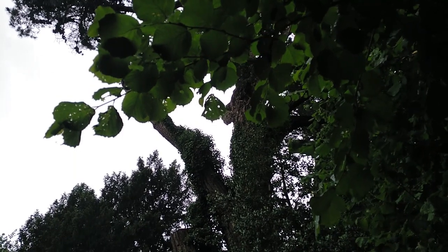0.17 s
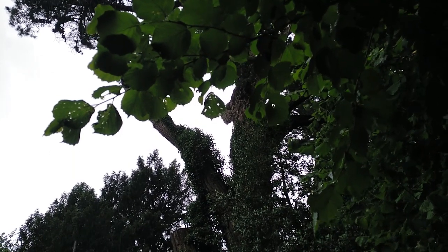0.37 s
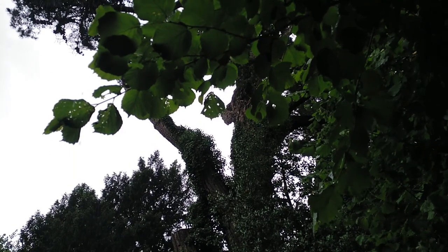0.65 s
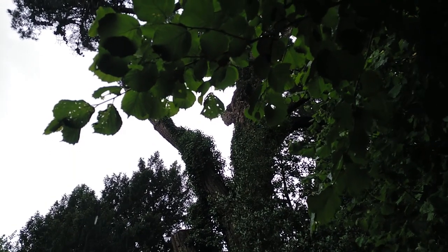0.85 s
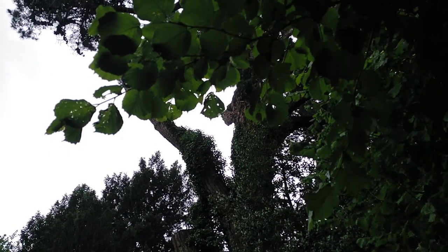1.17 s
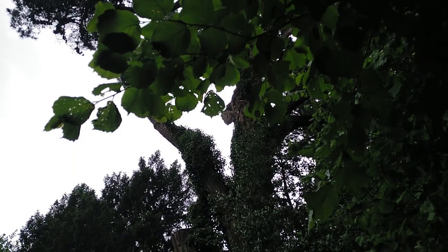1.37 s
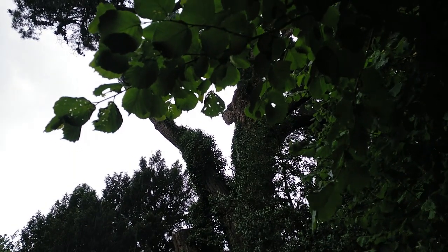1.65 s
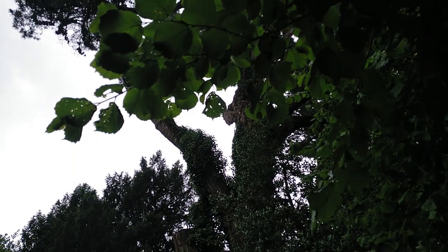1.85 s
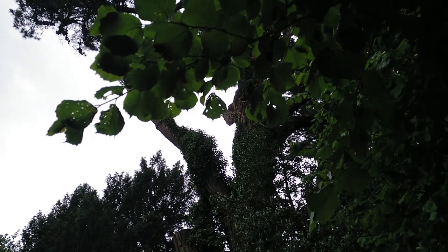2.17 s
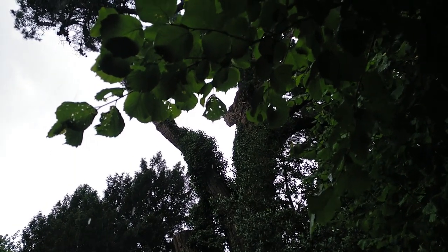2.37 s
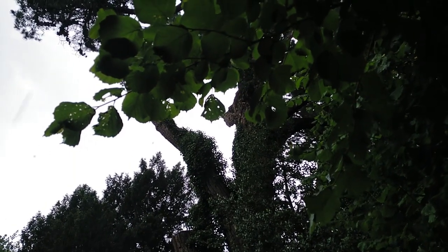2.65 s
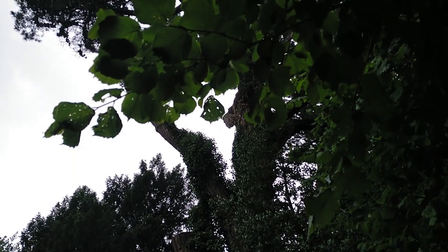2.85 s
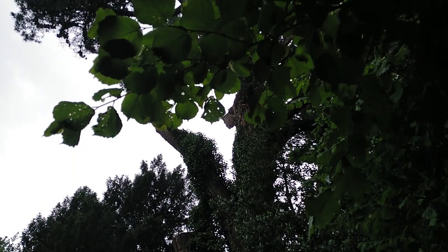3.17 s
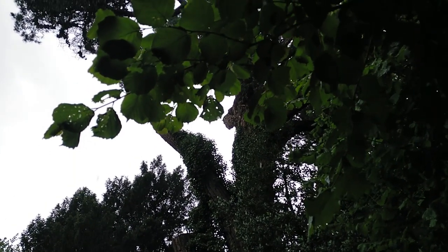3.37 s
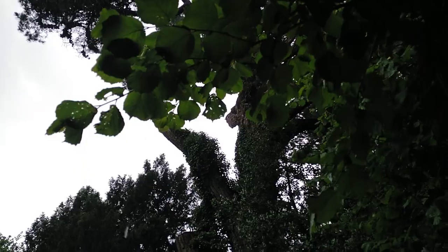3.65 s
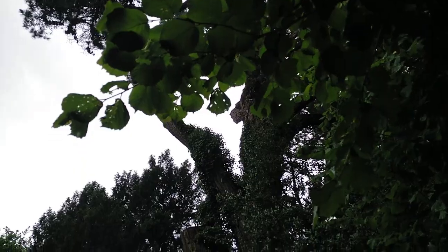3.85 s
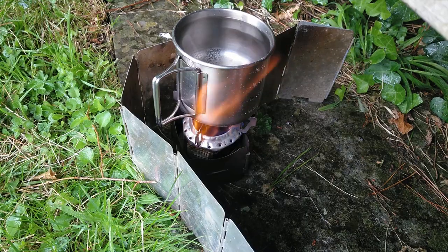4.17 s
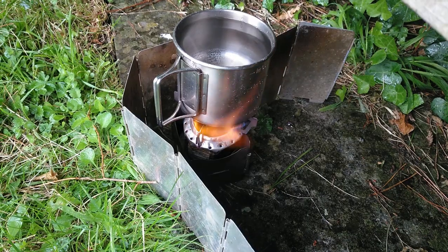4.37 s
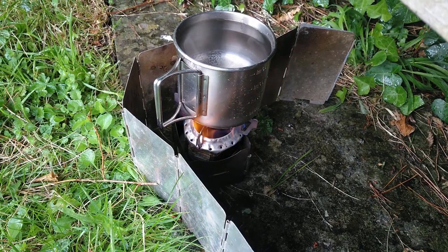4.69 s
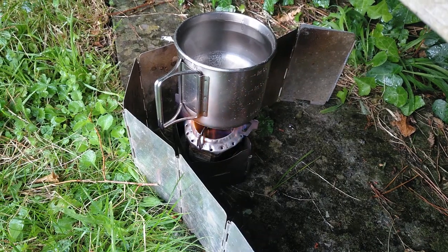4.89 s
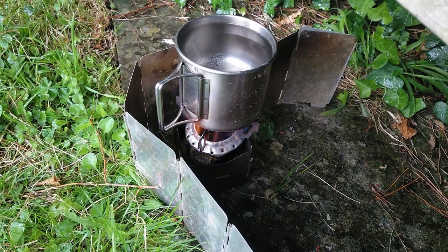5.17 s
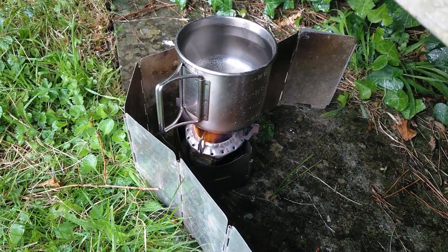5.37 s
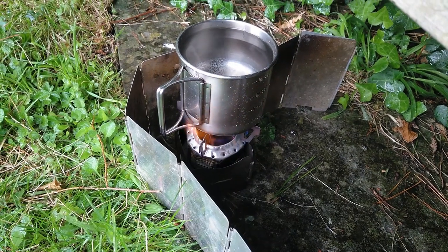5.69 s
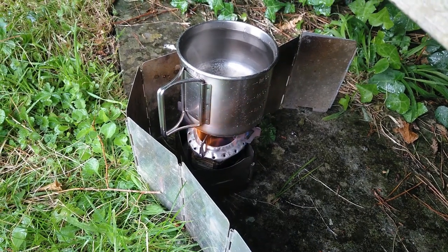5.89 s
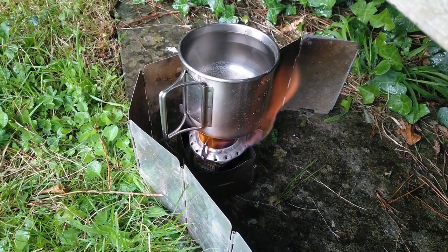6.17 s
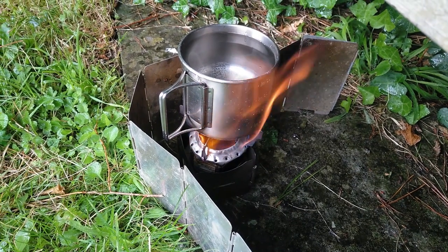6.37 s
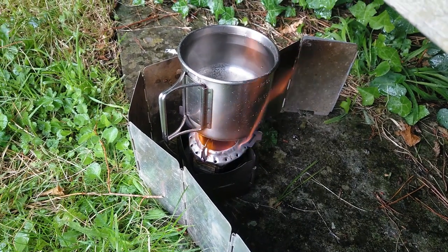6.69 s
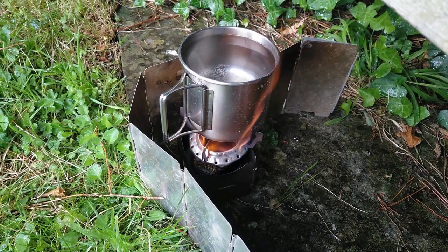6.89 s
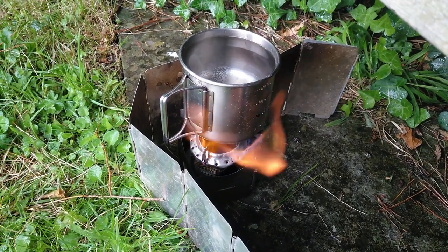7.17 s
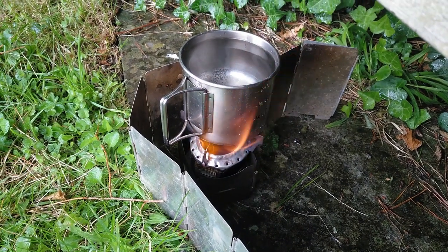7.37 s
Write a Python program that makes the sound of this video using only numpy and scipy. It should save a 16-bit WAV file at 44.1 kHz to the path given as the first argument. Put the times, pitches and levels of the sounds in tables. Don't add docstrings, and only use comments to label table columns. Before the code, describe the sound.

Outdoors, heavy rain hisses densely through a tree crown, with a few sharp leaf taps and a very faint distant engine hum. A soft thump and drop hits come just before an abrupt cut near four seconds. Then much quieter, thinner rain fades in quickly at ground level, with many close drops thudding, tapping and splashing on leaves and grass. Wide stereo microphone, close to the foliage.

```python
import sys
import numpy as np
from scipy import signal
from scipy.fft import rfft, irfft, next_fast_len
from scipy.io import wavfile
from scipy.ndimage import uniform_filter1d

SR = 44100
rng = np.random.default_rng(int(sys.argv[2]) if len(sys.argv) > 2 else 0)


def log_audio(samples):
    frames = np.atleast_2d(samples).T
    limited = np.clip(frames, -1, 1)
    pcm = np.round(limited * 32767).astype(np.int16)
    wavfile.write(sys.argv[1], SR, pcm)


def invert_db(level):
    return 10 ** (np.asarray(level, dtype=float) / 20)


N = 332060

# time_s, rain_level_db, rumble_level_db
CROWN_LEVELS = [
    (0.0, -38.5, -78),
    (1.47, -38.5, -78),
    (1.9, -38.5, -71),
    (3.77, -38.5, -74),
    (3.92, -38.5, -78),
]
GROUND_LEVELS = [
    (4.15, -49.5, -76),
    (4.29, -50, -76),
    (5.82, -49, -79),
    (6.1, -49, -72),
    (6.99, -49, -79),
    (7.53, -48.5, -70),
]
# time_s, gain_db
FADE_IN = [
    (3.925, -50),
    (3.95, -45),
    (3.9585, -30),
    (3.96, -14),
    (3.97, -15),
    (4.0, -9),
    (4.07, -7),
    (4.11, -2),
    (4.16, 0),
]
CROWN_END_S = 3.9243
# frequency_hz, density_db
CROWN_SPECTRUM = [(65, -31), (110, -24.5), (345, -10.5), (415, -8.5), (470, -4.5), (579, -5), (656, -1.5),
                  (2140, 2.5), (5120, -4.5), (8250, -9.5), (9540, -15.5), (11500, -28.5), (15700, -28.5)]
GROUND_SPECTRUM = [(65, -36), (110, -13.5), (189, -18), (324, -11), (603, -1.5), (807, -4.5), (1740, -1),
                   (3240, -3.5), (6570, -5), (9540, -14), (11500, -26), (14800, -25.5), (15700, -35)]
RUMBLE_SPECTRUM = [(13, -57), (22, -18), (58, 11), (75, 11), (129, -2.5), (160, -12), (210, -33),
                   (350, -120)]
# frequency_hz, correlation (1 = identical)
CROWN_COHERENCE = [(60, 0.43), (180, 1), (550, 0.77), (1650, -0.071), (4970, -0.033), (15000, -0.018)]
GROUND_COHERENCE = [(60, 0.9), (180, 0.83), (550, 0.75), (1650, 0.059), (4970, -0.059), (15000, 0.14)]
# frequency_hz, left_minus_right_db
CROWN_BALANCE = [(60, 0.5), (150, 0.5), (380, 0), (950, 2), (2380, 5), (5980, 2.5), (15000, -3.5)]
GROUND_BALANCE = [(60, 0), (150, -1.5), (380, 2), (950, 1), (2380, 2.5), (5980, -3), (15000, -1)]
# time_s, pitch_hz, level_db
ENGINE = [
    (1.6, 67, -79),
    (2.066, 70.5, -66),
    (2.5, 73.7, -76),
]
# start_s, peak_db, pitch_hz, t60_s
THUMPS = [
    (3.679, -41, 70, 0.12),
]
# frequency_hz, gain_db
NEAR_RESPONSE = [(50, -22), (200, -3.5), (8500, -2.5), (10500, -12.5), (12000, -11), (15700, -16),
                 (16000, -30)]

# start_s, peak_db, pitch_hz, left_minus_right_db
CROWN_THUDS = [
    (0.0392, -32, 775, 8),
    (3.6776, -38, 820, -9),
    (1.445, -35, 600, 0),
    (2.637, -36, 600, 0),
    (3.0955, -35, 600, 0),
]
GROUND_THUDS = [(4.1156, -42, 626, 1), (4.1512, -42, 780, 10), (4.2533, -45, 636, -2), (4.241, -44, 650, 0),
                (4.393, -47, 520, 0), (4.5004, -44, 650, -3), (4.5225, -45, 790, -2), (4.7475, -38, 724, 1),
                (4.7803, -40, 840, -1), (4.8436, -44, 820, -10), (4.9328, -42.5, 620, 1),
                (4.9918, -47, 530, 4), (5.1067, -42.5, 674, -4), (5.2205, -41, 830, 3),
                (5.2382, -39, 830, 0), (5.3931, -41, 940, -4), (5.4655, -44, 580, 2), (5.199, -45, 600, 0),
                (5.636, -44, 600, 0), (5.847, -44, 600, 0), (5.9215, -43, 600, 0), (7.439, -41, 1050, 0),
                (5.6307, -44, 910, -1), (5.8368, -34, 815, 1), (6.4932, -46, 740, 1.5),
                (6.5538, -31.5, 800, 5), (6.5852, -37, 600, 3), (6.7069, -46, 730, -1),
                (6.7377, -43, 910, 13), (6.802, -32.5, 580, 1), (7.2341, -37, 960, 0),
                (7.3209, -33.5, 760, -4), (7.305, -43, 600, 0), (7.3292, -38, 620, 7),
                (7.5032, -34.5, 650, 1), (7.5105, -40, 560, 2)]
LEAF_PUSHES = [
    (4.424, -47, 250, -21),
    (4.7478, -59, 260, -2),
    (6.1672, -42.5, 252, 3),
    (6.3656, -58, 180, 0),
    (6.8013, -50, 250, -1),
]
CROWN_TAPS = [
    (1.1014, -25, 1240, 3.4),
    (2.491, -27, 2270, 2),
    (2.7157, -29, 2550, 11),
    (0.486, -29, 2300, 3),
    (1.8465, -33, 1200, 2),
    (2.38, -30, 2300, 2),
]
GROUND_TAPS = [(4.1509, -42, 1380, 0), (4.2492, -38, 2550, 3), (4.4205, -30, 2250, 1),
               (4.272, -40, 2000, 0), (4.301, -41, 1250, 0), (5.2712, -37, 1870, -1), (6.707, -34, 1800, 2),
               (6.872, -36, 2180, -2), (4.5159, -36, 1830, 1), (4.6856, -37, 1640, 14),
               (4.8438, -38, 1870, 11), (4.9327, -40, 2290, 4.5), (4.9924, -35, 3100, -5),
               (4.9918, -33, 1850, -2), (6.098, -39, 2300, 0), (4.152, -38, 2300, 0),
               (5.1239, -39, 1500, 2), (5.1334, -41, 1820, 2), (5.217, -39, 2600, -5),
               (5.394, -41, 1300, 3), (5.6311, -37, 1660, -2), (5.6398, -38, 2420, 4),
               (6.5534, -36.5, 1500, 5), (6.7377, -36, 3050, -7), (6.8002, -40, 2450, -4),
               (7.2656, -42, 2330, -4), (7.3687, -35, 2600, -1), (7.3687, -37, 4100, -5),
               (7.4373, -37.5, 1690, 2.5), (7.4455, -38, 2250, 7), (7.5095, -31.5, 1770, -6)]
GLANCING_DROPS = [(4.4202, -27.5, 1500, 4), (4.4228, -35, 1150, -5), (4.4418, -46, 1500, -3),
                  (4.9917, -35, 3600, -2), (5.217, -39, 1300, -6), (7.1972, -33, 3000, -4),
                  (7.3687, -32, 1800, 4), (7.451, -37, 1200, 2), (7.5032, -35, 1150, 1),
                  (3.678, -21.5, 2500, 6), (3.8708, -25, 1730, 2.5), (5.3932, -32.5, 1500, 0),
                  (6.5532, -38, 1300, 4), (0.2815, -27, 1300, 4)]
CROWN_SPRAYS = [
    (0.751, -29, 5500, -0.5),
    (0.851, -26, 6480, -7),
    (0.93, -29, 4430, 1.5),
    (2.5423, -33, 4500, 0.5),
    (2.998, -32, 4620, 5),
    (3.4882, -31, 5390, 5),
    (2.568, -32, 5000, 0),
    (3.678, -31, 4180, -7.5),
]
GROUND_SPRAYS = [(4.1515, -39.5, 5310, -1), (4.2446, -42, 6070, -7), (4.516, -40, 4400, -13),
                 (4.7068, -42, 4000, 0), (4.9918, -32.5, 6690, -6.5), (5.1028, -37, 6160, -9),
                 (5.3675, -35.5, 4060, 2), (6.8025, -39, 7500, 0), (7.2085, -40, 8000, 0),
                 (7.284, -41, 8000, 0), (7.4635, -42, 8000, 0), (7.35, -38, 4800, 0), (6.885, -41, 8500, 0),
                 (5.5021, -46, 4830, -5), (5.6102, -49, 4700, -8), (5.8458, -30, 8000, -7.5),
                 (6.6659, -40, 6630, -6), (6.6783, -34, 7500, -8), (6.7379, -30.5, 5260, -11),
                 (6.801, -34, 4200, 4), (6.8656, -38, 5900, 8), (6.864, -39, 3200, 0),
                 (6.7395, -37, 5800, -8), (6.8758, -33, 5200, 7), (7.0385, -42, 6410, -6),
                 (7.1316, -38, 7000, -6), (7.197, -40, 4080, -1), (7.3464, -34, 5430, -10),
                 (7.3687, -31, 6250, 10), (7.4466, -36, 6120, -13), (7.477, -37, 5000, 0),
                 (7.5102, -42, 4610, -7)]
# start_s, peak_db, pitch_hz, left_minus_right_db
TAUT_RINGS = [
    (4.885, -38, 3550, 2.5),
    (6.3322, -46.5, 730, -2),
    (6.5959, -43, 2490, 4),
    (7.1972, -35, 3100, -8),
    (7.234, -35, 2850, 2),
    (7.2655, -42, 630, 0),
    (0.2787, -26.5, 2500, 9),
    (3.4668, -34, 990, 2),
]
# start_s, peak_db, pitch_hz, contact_s, left_minus_right_db
SPREADING_DROPS = [(5.3, -41, 490, 0.0048, -13), (5.2412, -35, 1310, .002, 11),
                   (5.2405, -40, 3000, 0.0035, 4), (5.244, -45, 1100, .008, 0), (5.246, -44, 2400, .003, 3),
                   (5.3658, -44, 1800, .0036, 5), (6.1525, -45, 480, .0073, 4),
                   (6.1668, -31.5, 1173, 0.005, 0), (6.1682, -32, 1550, 0.003, 10),
                   (6.168, -34.5, 1890, 0.0023, 4), (6.738, -41, 3100, .004, -3),
                   (7.3191, -38, 1410, .0026, 9), (7.5085, -39, 2500, 0.0056, -4),
                   (6.803, -50, 630, 0.0073, 2), (7.5095, -36, 1170, 0.004, 0)]
TAUT_SPREADS = [
    (4.448, -36, 6050, .0015, -5.5),
    (4.4508, -42, 6350, .0012, -4),
    (5.8460, -26.5, 2960, 0.0031, -5),
]
SPATTER_DROPS = [(1.1022, -33, 5200, 0.0025, 0), (1.1018, -29, 8200, .0015, 0),
                 (5.851, -39, 4800, .004, -3), (7.236, -40, 4500, .004, -3), (4.4942, -42, 4960, .0032, -9),
                 (5.241, -43, 5900, .004, -4), (5.2643, -40, 6260, .0036, -10),
                 (5.5205, -36.5, 4100, .002, -5), (5.848, -37, 8100, .004, -2),
                 (6.1668, -34, 3300, .003, 8), (6.1686, -29, 5100, .0042, -6),
                 (6.17, -33.5, 7300, .002, 2.5), (6.84, -40, 4230, 0.0033, -7),
                 (6.839, -38, 6860, 0.0034, -7.5), (5.8459, -32, 4600, 0.0014, -6),
                 (7.233, -37.5, 4430, .0032, -3.5)]
MIST_DROPS = [(3.959, -48, 5000, 0.0016, 1), (5.505, -46, 6000, 0.022, -2), (5.535, -39, 11900, 0.0037, -4),
              (5.8457, -30, 10000, 0.0008, -2), (6.169, -46, 9000, .003, 4),
              (6.8005, -36, 11000, .002, -4.5), (6.838, -43, 7950, 0.02, -1), (6.857, -38, 7800, 0.027, -3),
              (6.876, -36, 12900, .002, 1), (7.06, -49, 2500, 0.02, -1), (7.125, -45, 6000, 0.013, -2),
              (7.44, -45, 4000, .02, 0), (4.64, -44, 5000, .015, 0), (5.303, -45, 2500, .015, 0),
              (6.915, -47, 5000, .015, 0), (4.7, -47, 3000, .012, 0)]


def unit(x):
    return x / np.sqrt(np.mean(x ** 2) + 1e-20)


def along(points, hz):
    f, value = np.transpose(points)
    return np.interp(np.log(hz + 1), np.log(f + 1), value)


def curves(rows):
    time_s, *columns = np.transpose(rows)
    return [np.interp(np.arange(N) / SR, time_s, column) for column in columns]


def filtered(x, response):
    size = next_fast_len(N + 8192)
    return irfft(rfft(x, size) * response(np.fft.rfftfreq(size, 1 / SR)), size)[..., :N]


def patter(count, spread_db, cycles, centre_hz):
    when, pitch, size, place = rng.random((count, 4)).T[:, :, None]
    hz = centre_hz * invert_db(40 * (pitch - .5))
    turns = np.arange(200) / SR * hz
    ring = np.sin(2 * np.pi * turns) * turns * np.exp(-turns / cycles)
    ring = invert_db(spread_db * size ** 2) * ring * np.sqrt(hz)
    at = (when * N).astype(int) + np.arange(200)
    lag = ((place - .5) * 16).astype(int)
    pair = []
    for side in (1, -1):
        heard = ring * invert_db(7.9 * side * (place - 1.0))
        pair.append(np.bincount((at + 8 + side * lag).ravel(), heard.ravel(), N + 240)[:N])
    spectrum = np.abs(rfft(pair[0], next_fast_len(N + 8192)))
    whiten = 1 / np.sqrt(uniform_filter1d(spectrum ** 2, 2000) + 1e-9)
    return filtered(np.array(pair), lambda f: whiten)


def splashes(count, peak, decay_s):
    when, size = rng.random((count, 2)).T
    hits = np.bincount((when * N).astype(int), peak * size ** 3, N)
    return 1 + signal.fftconvolve(hits, np.exp(-np.arange(2048) / SR / decay_s))[:N]


def rush(source, spectrum, coherence, balance, patchy_db):
    z = signal.stft(source, nperseg=512)[2]
    patches = uniform_filter1d(rng.standard_normal(z.shape[1:]), 8, 0)
    patches = uniform_filter1d(patches, 8, 1)
    pair = signal.istft(z * invert_db(patchy_db * unit(patches)), nperseg=512)[1][:, :N]

    def turn(hz):
        return np.arcsin(np.clip(along(coherence, hz), -1, 1)) / 2

    def tone(hz):
        return invert_db(along(spectrum, hz) + np.outer([.5, -.5], along(balance, hz)))

    own = filtered(pair, lambda hz: tone(hz) * np.cos(turn(hz)))
    leaked = filtered(pair[::-1], lambda hz: tone(hz) * np.sin(turn(hz)))
    mixed = own + leaked
    return mixed / np.sqrt(np.mean((mixed[0] / 2 + mixed[1] / 2) ** 2))


def rain(levels, spectrum, coherence, balance, grains, swells, grain_share, patchy_db):
    rain_db, rumble_db = curves(levels)
    hiss = rng.standard_normal((2, N))
    source = np.sqrt(1 - grain_share) * hiss + np.sqrt(grain_share) * unit(grains)
    rumble = rush(rng.standard_normal((2, N)), RUMBLE_SPECTRUM, [(30, 0.9), (100, 1.0)], balance, patchy_db=2.0)
    shower = rush(source * np.sqrt(swells), spectrum, coherence, balance, patchy_db)
    return invert_db(rain_db) * shower + invert_db(rumble_db) * rumble


def crown_rain():
    grains = patter(count=20000, spread_db=7, cycles=1.2, centre_hz=2500)
    swells = splashes(count=300, peak=.8, decay_s=.011)
    return rain(CROWN_LEVELS, CROWN_SPECTRUM, CROWN_COHERENCE, CROWN_BALANCE, grains, swells,
                grain_share=.16, patchy_db=.4)


def brief(rows, cycles, sharpness):
    return [(s, db, hz, cycles / hz, sharpness, pan_db) for s, db, hz, pan_db in rows]


def spreading(rows, sharpness):
    return [(s, db, hz, contact_s, sharpness, pan_db) for s, db, hz, contact_s, pan_db in rows]


def drops(rows, wet, gain_db, scatter_db):
    out, t = np.zeros((2, N + 4096)), np.arange(3072) / SR
    for s, db, hz, contact_s, sharpness, pan_db in rows:
        q = max(sharpness, .5)
        shape = np.exp(-np.maximum(t - contact_s, 0) * np.pi * hz / q) * (1 - np.exp(-t * hz * 6))
        shape = shape * (1 + .8 * np.exp(-t * hz * 1.5))
        noise = rng.standard_normal((2, 2 * len(t)))
        noise = signal.lfilter(*signal.iirpeak(hz, q, SR), noise)[:, len(t):]
        ring = -np.sin(2 * np.pi * hz * t)
        splash = wet / (1 + (sharpness / 4) ** 2)
        shake = shape * (np.sqrt(1 - splash) * ring + np.sqrt(splash / 2) * unit(noise))
        shake = shake * np.sqrt(np.sum(shape ** 2) / 2 / np.sum(shake ** 2, axis=1, keepdims=True))
        echo = unit(noise) * np.exp(-t / 0.012) * (1 - np.exp(-t / 0.00077))
        shake = shake + invert_db(scatter_db) * echo
        power = invert_db(np.array([1, -1]) * pan_db)
        for side in (0, 1):
            start = round(s * SR + (side - .5) * 0.35 * pan_db)
            gain = invert_db(db + gain_db) * np.sqrt(power[side] / power.mean())
            out[side, start:start + len(t)] += shake[side] * gain
    return out[:, :N]


def thuds():
    rows = brief(LEAF_PUSHES, cycles=1.15, sharpness=2.3)
    rows += brief(GROUND_THUDS + CROWN_THUDS, cycles=1.2, sharpness=3)
    return drops(rows, wet=.2, gain_db=0, scatter_db=-13)


def taps():
    rows = brief(GROUND_TAPS + CROWN_TAPS, cycles=1.8, sharpness=1.9)
    rows += brief(TAUT_RINGS, cycles=3.5, sharpness=5)
    rows += spreading(SPREADING_DROPS, sharpness=1.7) + spreading(TAUT_SPREADS, sharpness=5)
    return drops(rows, wet=.25, gain_db=.5, scatter_db=-14.5)


def flicks():
    rows = brief(GLANCING_DROPS, cycles=.7, sharpness=1.3)
    return drops(rows, wet=.1, gain_db=.5, scatter_db=-16)


def sprays():
    rows = brief(GROUND_SPRAYS + CROWN_SPRAYS, cycles=5.5, sharpness=2.1)
    rows += spreading(SPATTER_DROPS, sharpness=1.7)
    return drops(rows, wet=.75, gain_db=0, scatter_db=-13)


def hum():
    hz, db = curves(ENGINE)
    t = np.arange(N) / SR
    live = (t > ENGINE[0][0]) & (t < ENGINE[-1][0])
    return uniform_filter1d(1. * live, 4000) * invert_db(db + 4.5) * np.sin(2 * np.pi * np.cumsum(hz) / SR)


def thump():
    t, tone = np.arange(N) / SR, np.zeros((2, N))
    for s, peak_db, low_hz, t60_s in THUMPS:
        since = np.maximum(t - s, 0)
        tone += [[1], [-.2]] * invert_db(peak_db - 60 * since / t60_s) * np.sin(2 * np.pi * low_hz * since)
    return tone


def ground_rain():
    grains = patter(count=14000, spread_db=6.5, cycles=1.2, centre_hz=2500)
    swells = splashes(count=150, peak=1.1, decay_s=.022)
    return rain(GROUND_LEVELS, GROUND_SPECTRUM, GROUND_COHERENCE, GROUND_BALANCE, grains, swells,
                grain_share=.11, patchy_db=.6)


def mist():
    return drops(spreading(MIST_DROPS, sharpness=.56), wet=.95, gain_db=0, scatter_db=-14)


def scene():
    t = np.arange(N) / SR
    tail_db = -60 - 1300 * np.abs(t - CROWN_END_S)
    cut = np.where(t < CROWN_END_S, 1, invert_db(tail_db))
    far = cut * (crown_rain() + hum() + thump())
    far = far + (t >= CROWN_END_S) * invert_db(curves(FADE_IN)[0]) * ground_rain()
    near = thuds() + taps() + flicks() + sprays() + mist()
    near = filtered(near, lambda hz: invert_db(along(NEAR_RESPONSE, hz)))
    return filtered(far, lambda hz: hz < 15780) + near


def roll_off(x):
    return signal.sosfilt(signal.butter(12, 16530, fs=SR, output="sos"), x)


def record(dry):
    mix = filtered(dry, lambda hz: hz < 16530)
    return roll_off(mix)


dry = scene()
out = record(dry)
log_audio(out)
```